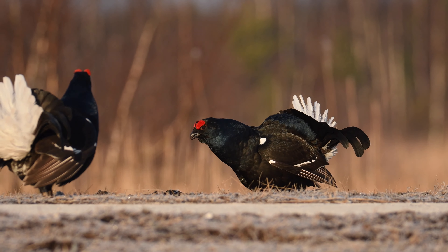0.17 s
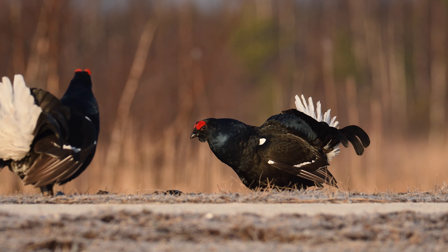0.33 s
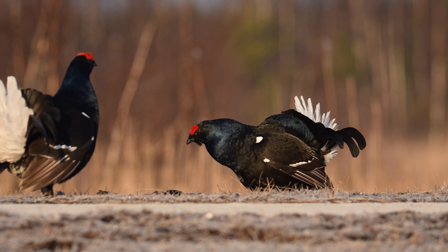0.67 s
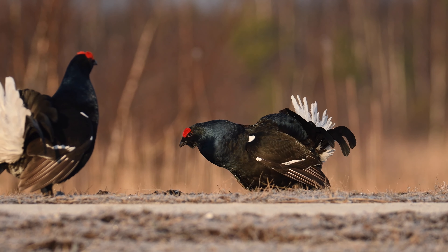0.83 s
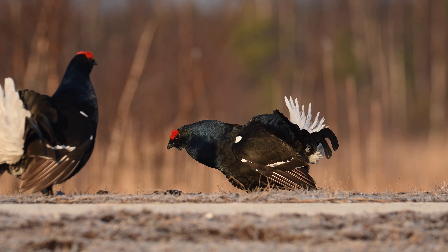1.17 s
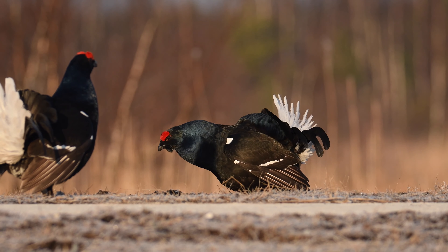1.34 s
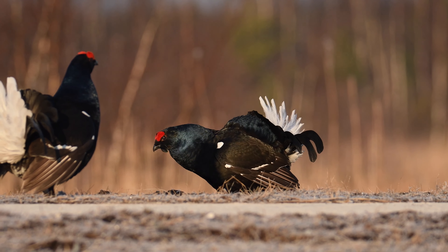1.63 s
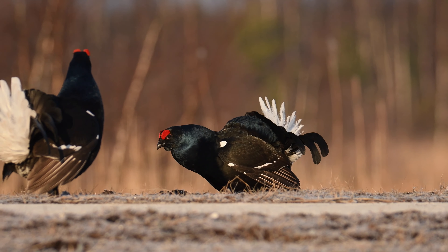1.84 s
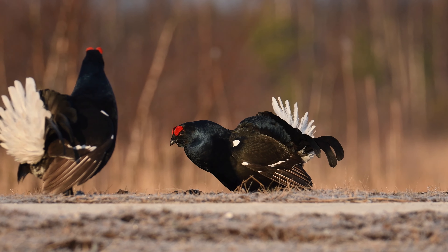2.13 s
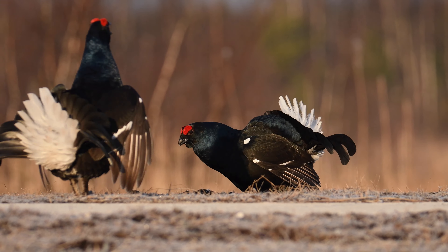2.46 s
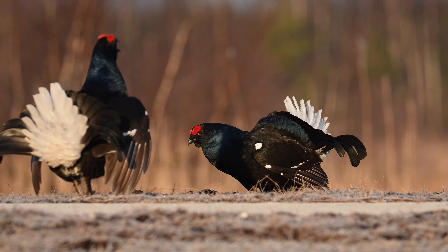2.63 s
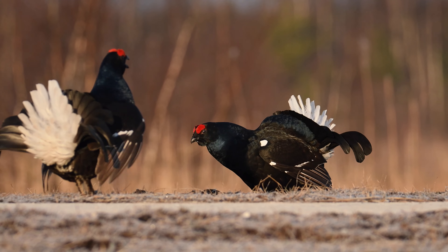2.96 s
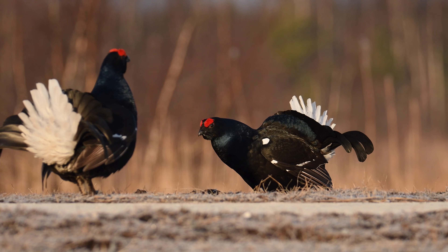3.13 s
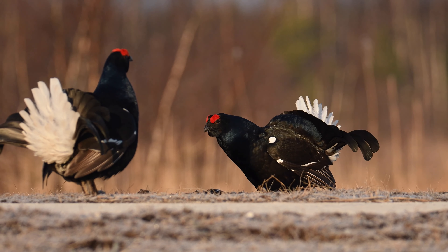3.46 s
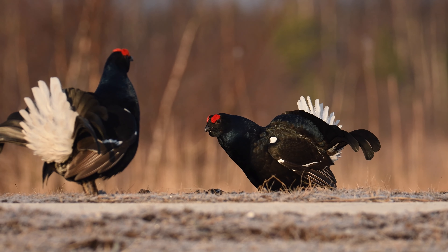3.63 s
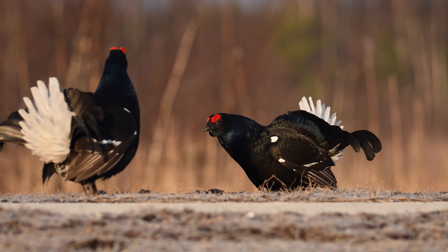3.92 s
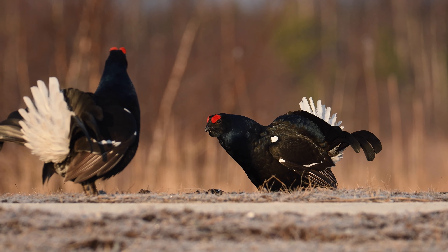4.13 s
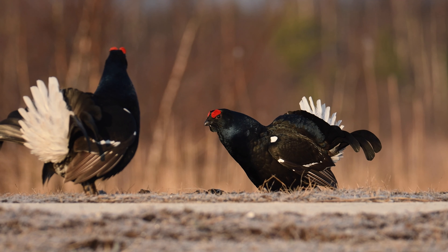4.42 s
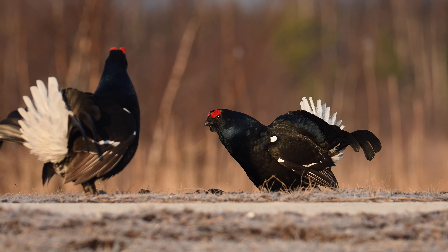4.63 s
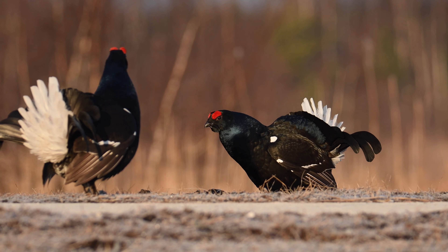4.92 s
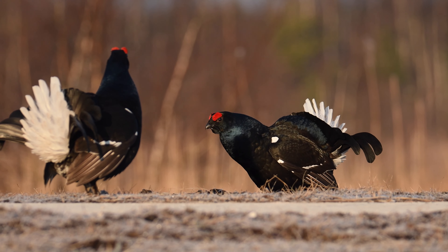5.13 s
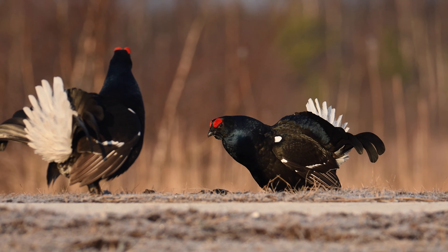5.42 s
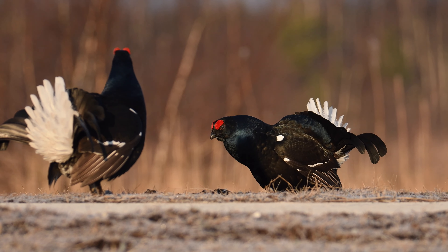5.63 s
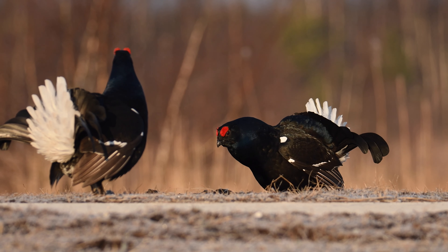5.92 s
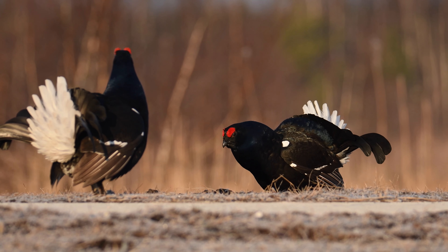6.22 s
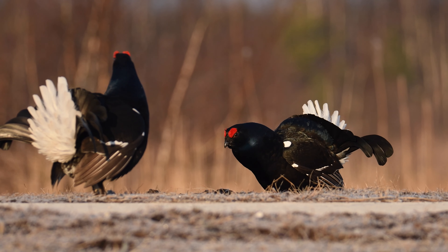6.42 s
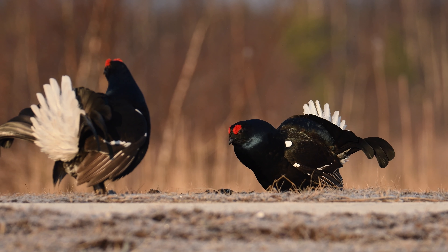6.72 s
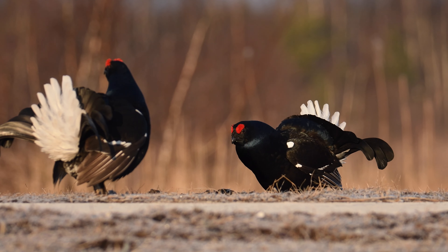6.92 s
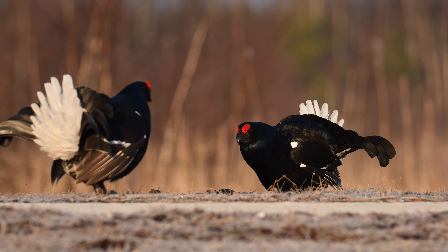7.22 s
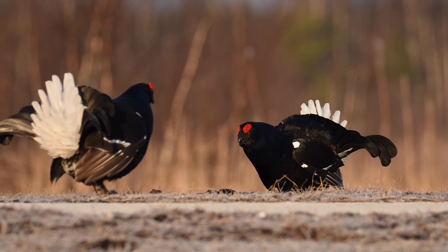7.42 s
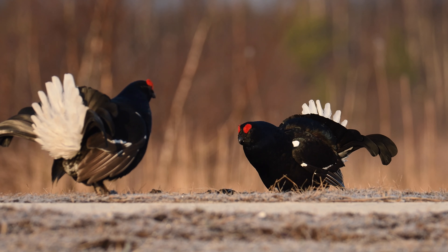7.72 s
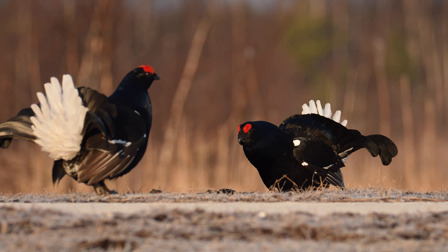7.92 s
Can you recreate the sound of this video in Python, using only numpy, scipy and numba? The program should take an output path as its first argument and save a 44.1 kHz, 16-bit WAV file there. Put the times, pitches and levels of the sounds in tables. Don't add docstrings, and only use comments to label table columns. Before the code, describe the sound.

Male black grouse display on open ground beside a wood, heard from a short distance. From the start a brief roll of low, round coos leads into a rippling phrase at about 0.6 s, with quick pulses, a held note and a fading tail. An even roll near 1.1-1.5 s brings a fuller, nearer phrase until about 2.9 s. At 2.6-3.2 s a cock blows a breathy hiss: a sharp first burst, an ebb, then a brighter push that stops abruptly. Softer bubbling continues beneath, and another full phrase runs from 3.4 to 4.5 s. After a thinner moment, a regular roll climbs from 4.5 to 5.5 s, and overlapping birds build to the loudest phrase around 6.3-7.5 s. A hurried phrase closes the stretch to about 8 s. Distant cocks murmur underneath, with faint air noise, light echoes and a barely audible thin whine.

```python
import sys
import numpy as np
from scipy import signal
from scipy.fft import rfft, irfft
from scipy.io import wavfile
from numba import njit

SR = 44100
rng = np.random.default_rng(int(sys.argv[2]) if len(sys.argv) > 2 else 0)


def log_audio(samples):
    frames = np.atleast_2d(samples).T
    limited = np.clip(frames, -1, 1)
    pcm = np.round(limited * 32767).astype(np.int16)
    wavfile.write(sys.argv[1], SR, pcm)


def volts_from_db(level):
    exponent = np.asarray(level, float) / 20
    return 10 ** exponent


N = 356328


def filt(x, hz, kind, order=2):
    return signal.sosfilt(signal.butter(order, hz, kind, fs=SR, output="sos"), x)


def rms_one(x):
    return x / np.sqrt(np.mean(x ** 2))


def in_time(rows):
    s, *columns = np.transpose(rows)
    return [np.interp(np.arange(N) / SR, s, c) for c in columns]


# frequency in Hz, density in dB per Hz.
AIR_SPECTRUM = [(25, -6), (75, 4.5), (400, 2), (800, -2), (2200, -6), (4800, -8.5), (6900, -13),
                (11400, -15), (15500, -16)]
AIR_DB = -63


def quiet_air(alike_hz=384):
    hz = np.maximum(np.arange(N // 2 + 1) * SR / N, 1)
    point_hz, point_db = np.transpose(AIR_SPECTRUM)
    shape = volts_from_db(np.interp(np.log(hz), np.log(point_hz), point_db))
    alike = 0.3 / (1 + hz / alike_hz)
    shared, left, right = rfft(rng.standard_normal((3, N)))
    ports = np.sqrt(alike) * shared + np.sqrt(1 - alike) * np.array([left, right])
    return volts_from_db(AIR_DB) * rms_one(irfft(shape * ports, N))


# multiple of the clock frequency, level in dB rms.
WHINE_OVERTONES = [(2, -89), (3, -93), (4, -93.5), (5, -91.5), (9, -100), (10, -95), (11, -99), (12, -100)]
WHINE_HZ = 1170.3


def clock_whine():
    t = np.arange(N) / SR
    whine = np.zeros(N)
    for multiple, level_db in WHINE_OVERTONES:
        turns = round(multiple) * WHINE_HZ * t + rng.random()
        whine += np.sqrt(2) * volts_from_db(level_db) * np.sin(2 * np.pi * turns)
    return whine


# notch centre in Hz, notch width in Hz.
PORT_NOTCHES = [(7680, 655), (9620, 850)]


def through_ports(x):
    hz = np.arange(N // 2 + 1) * SR / N
    gain = np.prod([1 - 1 / (1 + (2 * (hz - f) / width) ** 2) for f, width in PORT_NOTCHES], axis=0)
    return irfft(rfft(x) * gain, N)


def scatter(x, t60, count=60):
    out = np.zeros_like(x)
    for lag, sign, port in rng.random((count, 3)):
        d = round((.003 + lag * t60) * SR)
        port_gains = [[.5 + port], [1.5 - port]]
        out[:, d:] += volts_from_db(-60 * lag) * np.sign(sign - .5) * x[:, :-d] * port_gains
    return out


def coos(rows, pan_db, pan_spread_db, freedom):
    voice, tilt = np.zeros(N, complex), np.zeros(N, complex)
    for (s, level_db, hz, glide, arch, ms), (turn, side) in zip(rows, rng.random((len(rows), 2))):
        size = ms / 1000
        at = np.arange(max(0, round((s - 4 * size) * SR)), min(N, round((s + 3 * size) * SR)))
        u = (at / SR - s + .0015) / size
        swell = np.exp(-.45 * abs(u / np.where(u < 0, 1.15, .85)) ** (1.633 + ms / 22))
        tension = 2 * np.tanh(u / 2)
        pitch = hz + glide * tension + arch * tension ** 2
        coo = swell * np.exp(2j * np.pi * np.cumsum(pitch) / SR)
        overlap = np.vdot(coo, voice[at]) + freedom * np.exp(2j * np.pi * turn)
        coo = coo * volts_from_db(level_db) * overlap / abs(overlap)
        voice[at] += coo
        tilt[at] += coo * pan_spread_db * (side - .5) / 8.7
    return np.array([(voice + tilt) * volts_from_db(pan_db / 2), (voice - tilt) * volts_from_db(-pan_db / 2)])


# time in seconds, level in dB.
CHORUS_LEVEL = [(.2, -55), (.25, -85), (.36, -98), (.42, -56), (3.3, -57), (4.5, -60.5), (5.1, -54.5),
                (5.5, -58), (5.62, -66), (5.8, -58), (6.8, -58.5), (7.5, -56), (7.62, -76), (7.75, -56),
                (8.08, -55.5)]


def far_chorus(count=650):
    a = rng.random((count, 5))
    s = (np.arange(count) + a[:, 0]) / count * N / SR
    level_db = 7 * a[:, 1] + 14 * np.sqrt(a[:, 2])
    hz = 310 + 240 * a[:, 2]
    glide_hz = -5 - 25 * a[:, 3]
    ms = 5 + 8 * a[:, 4]
    chorus = coos(np.c_[s, level_db, hz, glide_hz, 0 * s, ms], pan_db=4.0, pan_spread_db=8, freedom=1e9).real
    return volts_from_db(in_time(CHORUS_LEVEL)[0]) * rms_one(chorus)


@njit
def moving_resonance(x, hz, r, rate):
    y = np.zeros(len(x))
    for i in range(2, len(x)):
        drive = (1 - r * r) / 2 * (x[i] - x[i - 2])
        y[i] = drive + 2 * r * np.cos(2 * np.pi * hz[i] / rate) * y[i - 1] - r * r * y[i - 2]
    return y


def resonate(x, hz, width_hz):
    r = np.exp(-np.pi * width_hz / SR)
    return rms_one(moving_resonance(moving_resonance(x, hz, r, SR), hz, r, SR))


# time in seconds, level in dB, windpipe resonance in Hz,
# beak resonance in Hz, level of the top resonance in dB.
HISS_COURSE = [
    (2.562, -67, 1940, 2994, -20),
    (2.574, -55.5, 1900, 2860, -23),
    (2.634, -53, 1730, 3490, -13.5),
    (2.77, -63.5, 1600, 2800, -12),
    (2.9, -60.5, 1650, 3380, -8),
    (3.048, -59.5, 1830, 3540, -2),
    (3.1, -56, 2350, 3100, -7.5),
    (3.155, -55, 2550, 2820, -15.5),
    (3.2, -76, 2410, 2780, -14),
]


def hiss():
    level_db, pipe_hz, beak_hz, top_db = in_time(HISS_COURSE)
    s, air = np.arange(N) / SR, rng.standard_normal((4, N))
    body = resonate(air[0], pipe_hz, 450) + volts_from_db(-1.5) * resonate(air[1], beak_hz, 680)
    body = body + volts_from_db(level_db / 2 + 24) * rms_one(filt(air[2], [1900, 3600], "band"))
    top_hz = np.interp(s, [2.68, 2.85], [4700, 5850])
    top = volts_from_db(top_db) * resonate(air[3], top_hz, 1250)
    sounding = (s > HISS_COURSE[0][0]) & (s < HISS_COURSE[-1][0])
    breath = volts_from_db(level_db) * sounding * (rms_one(filt(body, 1300, "high", order=6)) + top)
    return np.array([breath * volts_from_db(-.5), np.roll(breath, 1) * volts_from_db(.5)])


# last coo in seconds, spacing in ms, number of coos,
# peak level in dB, coo length in ms.
LEAD_ROLLS = [
    (0.194, 77.4, 4, -30.5, 7.7),
    (1.459, 80, 6, -32, 12),
    (3.032, 76, 4, -33.5, 8),
    (5.513, 73.5, 15, -35, 12),
    (6.038, 76, 6, -29.5, 11),
]
SLACK_HZ, TIGHT_HZ, SLACK_DB, ROLL_GLIDE_HZ, TIGHTENS_COOS = 460, 580, -46.5, -35, 2.9
HURRY_S, CLIPPED_SHARE, TIRED_DB, BEGIN_DB = 0.00901, .62, -1.5, -3


def rolls():
    rows = []
    for last, spacing_ms, total, peak_db, ms in LEAD_ROLLS:
        back = np.arange(round(total))
        tight = np.exp(-(back / (TIGHTENS_COOS + .11 * total)) ** 2.7)
        s = last - back * spacing_ms / 1000 + HURRY_S * (back > 0)
        slack_gain_db = SLACK_DB - peak_db + BEGIN_DB * (back == back[-1])
        level_db = peak_db + slack_gain_db * (1 - tight) ** 1.5 + TIRED_DB * (back == 0)
        hz = SLACK_HZ + (TIGHT_HZ - SLACK_HZ) * tight
        glide_hz = ROLL_GLIDE_HZ * (.75 + .25 * tight)
        rows += zip(s, level_db, hz, glide_hz, ms * np.where(back > 0, 1, CLIPPED_SHARE))
    return rows


# start in seconds after the tick,
# peak level in dB, pitch in Hz, glide in Hz per coo length, length in ms.
NEAREST_FIGURE = [(-.136, -42, 462.4, -18, 14), (-.1, -38.5, 486.3, -19, 9.3), (0, -31, 553, -38.5, 5.5),
                  (.142, -30, 568.7, 10.5, 14), (.225, -39.5, 480.7, 3.5, 13), (.316, -28.5, 562.7, 7, 8.3),
                  (.364, -40, 609.5, 0, 29), (.433, -30, 571.8, -21.5, 12), (.48, -46, 494.7, -30.5, 27),
                  (.542, -32.5, 555.4, -24.5, 9.5), (.592, -44, 472.5, 27.5, 12),
                  (.63, -31.5, 580, -37, 12), (.678, -32.5, 560, -13.5, 6), (.7, -35, 580, -27, 8.5),
                  (.757, -40, 567.6, 8, 12.7), (.844, -29, 555.5, -10, 11.5), (.925, -34, 518, 12, 10),
                  (.996, -33, 583, -10, 8), (1.035, -43.5, 534.5, -29, 20)]
NEIGHBOUR_FIGURE = [(-.115, -40, 525, -29, 17), (0, -33, 573, -21.5, 4.5), (.113, -38, 548, 66.5, 6.5),
                    (.154, -33, 593, -5.5, 5.5), (.216, -40.5, 517.5, -28, 14.5),
                    (.295, -37, 561.3, 30.5, 8), (.357, -38.5, 606, 0.5, 38), (.43, -34, 573.8, -27, 10.9),
                    (.57, -36.5, 575, 34, 8.1), (.615, -40, 565.6, -35, 8), (.64, -38, 580, 31.5, 7),
                    (.668, -39, 560, -19, 4.6), (.733, -37, 553, -5.5, 4), (.817, -34.5, 588, 23.5, 9),
                    (.846, -29.5, 591, -11, 3.3), (.915, -32, 577.5, 2.5, 11), (.95, -35.5, 592, 9, 4),
                    (.992, -32, 573, -22, 6.7)]
# tick in seconds, level in dB, stretch of time as a factor,
# gain in dB after the held note, pitch shift in Hz.
NEAREST_TIMES = [
    (1.871, -1.5, 1.001, 1, 2.5),
    (3.053, -8, 1.012, -6, 6),
    (6.475, 2, 1.001, -2, -2.5),
]
NEIGHBOUR_TIMES = [
    (.632, -0.85, .998, -3, 3.5),
    (3.461, -1.4, 1.005, 1, -2.5),
    (5.945, -3.7, 1.001, -11, -11.5),
    (7.627, 0.43, 0.97, -2, 2),
]
HELD_ENDS_S = .46


def strophes(figure, times):
    rows = []
    for tick, gain_db, stretch, after_db, shift_hz in times:
        for s, level_db, hz, glide, ms in figure:
            level_db = level_db + gain_db + after_db * (s > HELD_ENDS_S)
            rows.append((tick + s * stretch, level_db, hz + shift_hz, glide, ms))
    return rows


HELD_MS, SLIDES_OVER_HZ = 21, 500
SLIDE_DB, SLIDE_HZ, SLIDE_LENGTHS, SLIDE_GLIDE_HZ = -16, 417.6, 1.67, 22


def slides(notes):
    rows = []
    for s, level_db, hz, glide, ms in notes:
        if ms < HELD_MS and hz > SLIDES_OVER_HZ:
            for way in (-1, 1):
                if way * glide < 10:
                    at = s + way * SLIDE_LENGTHS * ms / 1000
                    rows.append((at, level_db + SLIDE_DB, (hz + SLIDE_HZ) / 2, -way * SLIDE_GLIDE_HZ, ms))
    return rows


# start in seconds, peak level in dB, pitch in Hz,
# glide in Hz per coo length, length in ms.
STRAY_COOS = [(.024, -41.5, 595, -17, 5), (.483, -44, 557, -30, 7), (3.988, -35, 543, 5, 11),
              (1.174, -40, 583, 11, 3.4), (1.675, -50, 612, -23, 9.4), (6.61, -34, 565, 0, 13),
              (4.07, -33, 570, -30, 9), (4.133, -32, 564, -4, 4.2), (2.825, -47.5, 578, -3, 24),
              (2.921, -48.5, 520, -47.5, 29), (3.107, -42, 507, -51.5, 5.6), (3.196, -45.5, 594, -30, 15),
              (3.33, -44.5, 541, 24.5, 33.5), (3.409, -46, 623.5, 3, 40), (3.706, -36.5, 580, 24, 5.7),
              (3.899, -36, 563, -7, 15), (4.695, -41, 584, 4, 3.7), (6.01, -41, 602, 13, 7.8),
              (6.08, -43, 560, 34, 10), (3.49, -35, 564, -27, 9), (6.788, -30, 565, 0, 14),
              (6.959, -32, 570, -19, 5.6), (7.445, -35, 570, 30, 8), (3.736, -35, 567, -45, 9)]
# start in seconds, peak level in dB, pitch in Hz, length
# in ms.
SLACK_MURMURS = [(.432, -55, 398, 33), (.957, -45, 470, 17.1), (1.49, -49, 453, 23), (2.24, -48.5, 483, 40),
                 (2.767, -51, 469, 32), (3.362, -59, 477, 45), (3.739, -38.5, 482, 4.6),
                 (3.925, -53, 468, 38), (4.052, -48, 492.4, 28), (4.277, -46, 468, 15),
                 (4.936, -45.5, 493, 16), (4.99, -55, 570, 12), (1.718, -42, 500, 4), (1.15, -43, 480, 14),
                 (5.291, -51.5, 404, 23), (6.187, -46.5, 467, 22), (6.33, -42, 485, 8),
                 (6.406, -45, 485, 22.5), (6.552, -44.5, 467, 10), (6.942, -45.5, 477, 32),
                 (6.86, -42, 514, 20), (7.2, -50.5, 479.5, 20), (7.865, -49, 455, 6.5),
                 (7.944, -37, 466, 3.1)]
MURMUR_GLIDE_HZ, ARCH_HZ = -12.5, -9
SAC_HZ, SAC_WIDTH_HZ, SAC_RING_DB = 566, 61.4, -5.5


def near_cocks():
    notes = strophes(NEAREST_FIGURE, NEAREST_TIMES) + strophes(NEIGHBOUR_FIGURE, NEIGHBOUR_TIMES)
    notes += rolls() + list(STRAY_COOS)
    notes += slides(notes)
    notes += [(s, level_db, hz, MURMUR_GLIDE_HZ, ms) for s, level_db, hz, ms in SLACK_MURMURS]
    rows = [(s, level_db, hz, glide, ARCH_HZ * (ms < HELD_MS), ms)
            for s, level_db, hz, glide, ms in notes if 0 < s < N / SR]
    flutter = rms_one(filt(rng.standard_normal(N), [25, 110], "band"))
    song = coos(rows, pan_db=3.8, pan_spread_db=3, freedom=1e-3) * (1 + .1 * flutter)
    r = np.exp(-np.pi * SAC_WIDTH_HZ / SR)
    poles = [1, -2 * r * np.cos(2 * np.pi * SAC_HZ / SR), r * r]
    ring = signal.lfilter([(1 - r * r) / 2, 0, (r * r - 1) / 2], poles, song)
    song = (song + volts_from_db(SAC_RING_DB) * ring) * volts_from_db(-2.5)
    return (song / np.hypot(1, abs(song).mean(axis=0) / .085)).real


def scene():
    song = filt(near_cocks() + far_chorus(), 744, "low", order=8)
    song[1] = np.roll(song[1], 3)
    birds = song + hiss()
    return birds + volts_from_db(-19.5) * scatter(birds, t60=0.12) + quiet_air()


def top_cut(x):
    return signal.sosfilt(signal.butter(12, 15640, fs=SR, output="sos"), x)


def record(dry):
    mix = through_ports(dry) + clock_whine()
    return top_cut(mix)


dry = scene()
out = record(dry)
log_audio(out)
```